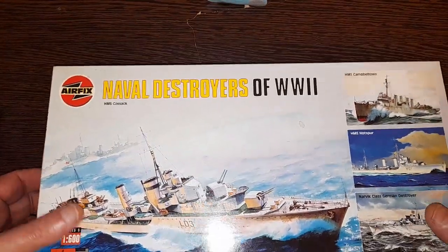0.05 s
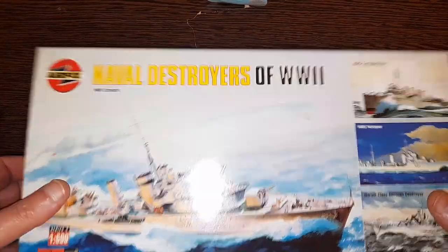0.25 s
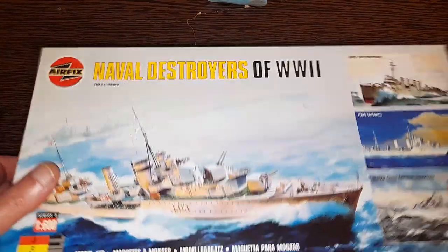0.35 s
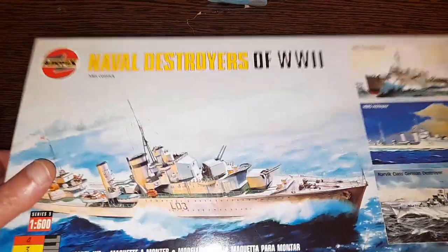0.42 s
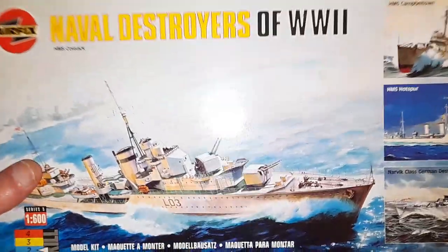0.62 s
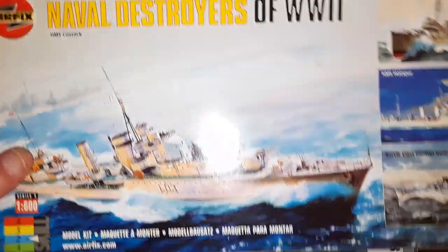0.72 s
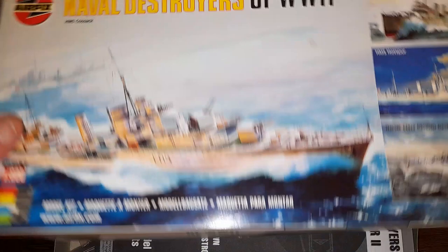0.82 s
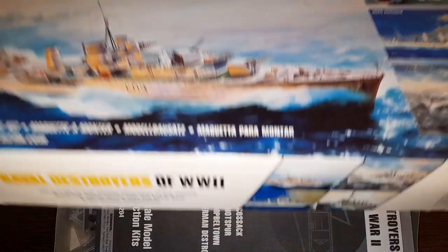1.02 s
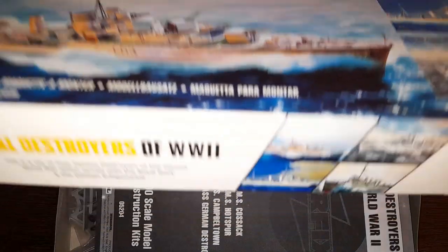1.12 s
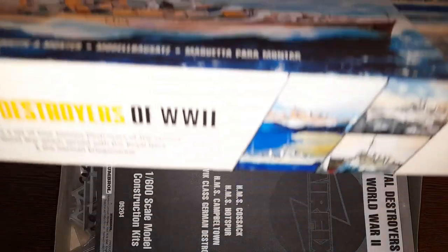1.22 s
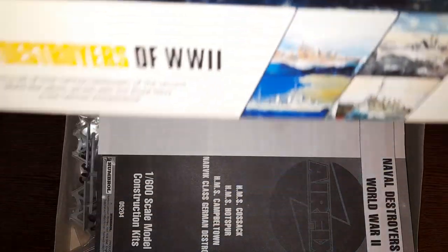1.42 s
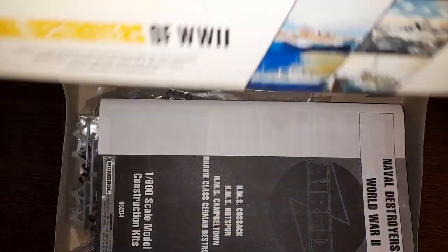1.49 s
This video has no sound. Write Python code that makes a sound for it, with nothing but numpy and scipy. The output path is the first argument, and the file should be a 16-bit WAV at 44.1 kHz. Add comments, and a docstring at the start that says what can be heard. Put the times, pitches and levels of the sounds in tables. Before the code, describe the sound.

A cardboard lid scrapes off its box, with hollow knocks and a papery slide.

```python
"""A cardboard lid is worked off its box by hand, close to the microphone in a small room.
First the tight walls stick and slip, and card scrapes and hisses against card.
Lid and box knock together, then the box drops on the table with a hollow boom.
Last, the freed lid bumps lightly a few times and slides away with a papery hiss."""
import sys
import numpy as np
from scipy import signal
from scipy.fft import rfft, irfft, next_fast_len
from scipy.io import wavfile
from scipy.ndimage import uniform_filter1d

SR = 44100
rng = np.random.default_rng(int(sys.argv[2]) if len(sys.argv) > 2 else 0)


def digitize_waveform(pressure):
    """Quantize a signal to 16-bit integers and store it at the path in sys.argv[1].

    Rows of a 2-D input are taken as channels; values are limited to [-1, 1].
    """
    field = np.atleast_2d(pressure).T
    bounded = np.clip(field, -1, 1)
    quanta = np.round(bounded * 32767).astype(np.int16)
    wavfile.write(sys.argv[1], SR, quanta)


N = 68355  # samples: 1.55 s


# How hard the walls shake: time_s, lid_db, box_db
WALL_SHAKE = [(0, -31.5, -47.5), (.04, -49.5, -50), (.1, -50, -57), (.125, -40, -61), (.165, -35.5, -60.5),
              (.195, -39.5, -39.5), (.22, -27, -30.5), (.255, -36, -36.5), (.285, -27, -31),
              (.32, -32, -21), (.355, -20, -42), (.385, -33.5, -28), (.43, -35, -36), (.48, -43, -49.5),
              (.58, -65, -66), (0.689, -74.5, -72), (0.729, -55.5, -75), (.8, -69, -80), (1.48, -88, -85),
              (1.545, -61.5, -57)]
# How hard the freed lid drags: time_s, level_db
DRAG_LEVEL = [(.69, -76.5), (.72, -53), (.78, -62.5), (.9, -71), (.945, -43), (.98, -54.5), (1.01, -57),
              (1.11, -63), (1.28, -61.5), (1.37, -77.5), (1.49, -89.5), (1.55, -66)]
# How much the air in the box is stirred: time_s, level_db
STIR_LEVEL = [(0, -54), (.1, -61.5), (.19, -54), (.225, -34.5), (.27, -26.5), (.34, -28.5), (.44, -32),
              (.55, -51), (.76, -79.5), (.81, -77), (.845, -48), (.89, -65), (1.2, -71.5), (1.3, -67.5),
              (1.38, -77), (1.5, -71.5), (1.55, -60)]
# Tones of the lid's walls: pitch_hz, width_hz, level_db
LID_WALL_TONES = [(436, 100, 0.5), (431, 77, -1.5), (489, 54, -4.5), (614.5, 14, -3.5), (619, 15, -7)]
# Tones of the box's walls: pitch_hz, width_hz, level_db
BOX_WALL_TONES = [(222, 52, -6), (265, 67, 1.5), (309.8, 42, 4.5)]
# Tones of the dragging lid: pitch_hz, width_hz, level_db
DRAG_TONES = [(330, 35, -4.5), (352, 23, -4.5), (420, 29, -3), (510, 46, -9)]
# Tones of the air inside: pitch_hz, width_hz, level_db
INSIDE_TONES = [(88, 60, 0), (140, 21, -10.5)]

def judder():
    """The tight walls stick and slip, stirring the air inside; later the freed lid drags."""
    lid = level(WALL_SHAKE) * shaken(LID_WALL_TONES)
    box = level(WALL_SHAKE, column=2) * shaken(BOX_WALL_TONES)
    drag = level(DRAG_LEVEL) * shaken(DRAG_TONES)
    air = level(STIR_LEVEL) * shaken(INSIDE_TONES)
    return amp(2.5) * (lid + box + drag + air)


def shaken(tones):
    """Uneven slips shake card or air, which answers most near its own tones."""
    def response(hz):
        return sum((-1) ** k * amp(db) * 1j * hz * width / (pitch ** 2 - hz ** 2 + 1j * hz * width)
                   for k, (pitch, width, db) in enumerate(tones))
    shaking = filtered(slips(per_s=380, spread_db=1, smooth=.78), response)
    return coloured(shaking, [(40, -4), (90, 10), (650, -2.5), (1500, -17)])


# Blows on the box: start_s, body_db, bright_hz, panel_hz, panel_db, boom_db, crack_db
BLOWS = [(0.214, -40.5, 450, 300, -14.5, -42.5, -57), (.267, -36, 700, 390, -13, -37, -35),
         (0.2884, -18.5, 1754, 1096, -3, -43.5, -12), (0.294, -6.5, 840, 607, 0.5, -22.5, -43),
         (0.3163, -28, 900, 520, -15, -39, -39), (0.3946, -13, 324, 350, -0.5, -10.5, -42),
         (0.439, -25.5, 325, 330, -18.5, -22, -44.5)]
# Ringing of the box (a fade is a fall of 60 dB): pitch_hz, level_db, fade_s
BOX_RING = [(233.5, -3.5, 0.17), (322, -9, 0.16), (404.2, -9.5, 0.14), (439, -4.5, .12), (511.6, 1, 0.1),
            (554, -17, 0.1), (587, -10.5, 0.037), (694, -22, 0.055), (826, -18.5, 0.053), (988, -16.5, .05),
            (975, -16.5, 0.027), (1195, -14.5, .07), (1316, -12, 0.033), (1486, -11.5, 0.17)]
# Boom of the hollow box on the table: pitch_hz, level_db, fade_s
BOOM_TONES = [(46.6, -13.5, 0.17), (77, -4.5, .1), (97.2, -0.5, 0.37), (110.8, 0, .13), (140.6, -11, 0.3)]

def knocks():
    """Each blow swings the struck panel, rings the box and pumps the air inside."""
    out, t = np.zeros((2, N)), np.arange(N) / SR
    boom_rise_s, flex_fade_s = .0027, .034
    rise_cycles, fade_cycles = .25, 16
    lead_rad = np.array([[.3], [-.3]])  # the boom reaches left and right out of step
    boom = sum(np.sin(2 * np.pi * hz * t + lead_rad) * amp(db - 60 * t / fade_s)
               for hz, db, fade_s in BOOM_TONES)
    boom *= 1 - np.exp(-t / boom_rise_s)
    for start_s, body_db, bright_hz, panel_hz, panel_db, boom_db, crack_db in BLOWS:
        cycles = panel_hz * t
        panel = np.sin(2 * np.pi * cycles) * amp(panel_db - 60 * cycles / fade_cycles)
        panel *= 1 - np.exp(-cycles / rise_cycles)
        # the card's many short-lived tones blur into a burst of noise
        flex = filtered(noise(CARD_COLOUR), lambda hz: softness(hz, bright_hz))
        flex *= amp(2 - 60 * t / flex_fade_s)
        body = amp(body_db) * (ring(BOX_RING, bright_hz) + flex)
        add(out, start_s, panel + body + amp(boom_db) * boom + amp(crack_db) * crack())
    return out


def ring(tones, bright_hz):
    """Struck card rings with fading tones, their levels a little different each time."""
    t = np.arange(N) / SR
    scatter_db, rise_s = 1.2, .00071
    out = np.zeros(N)
    for k, (hz, db, fade_s) in enumerate(tones):
        fade = amp(db + scatter_db * rng.normal() - 60 * t / fade_s)
        out += (-1) ** k * fade * softness(hz, bright_hz) * np.sin(2 * np.pi * hz * t)
    return out * (1 - np.exp(-t / rise_s))


def softness(hz, bright_hz):
    """A soft contact weakens the tones above bright_hz."""
    return 1 / np.hypot(1, (hz / bright_hz) ** 2)


# Tone colour of a snapping edge: pitch_hz, level_db
CRACK_COLOUR = [(200, -25.5), (700, 7.5), (1300, 14.5), (2400, -1), (4500, -2.5), (6500, -4), (9000, -15.5),
                (12000, -17), (16000, -19.5)]

def crack():
    """One card edge snaps past another with a short rasp."""
    t = np.arange(N) / SR
    hold_s, fade_s = .0035, .008
    return noise(CRACK_COLOUR) * amp(-60 * np.maximum(t - hold_s, 0) / fade_s)


# How hard a card edge scrapes: time_s, level_db
SCRAPE_LEVEL = [(0, -47), (.09, -49), (.14, -47), (.205, -36), (.258, -37.5), (.28, -31), (.34, -30.5),
                (.38, -32.5), (.42, -37), (.49, -50), (.6, -67), (.65, -69), (.695, -68.5), (.75, -77)]
# Hiss that follows the tight lid's sliding speed: time_s, level_db
HISS_LEVEL = [(0, -44.5), (.08, -65.5), (.12, -56.5), (.21, -37), (.255, -46), (.275, -34), (.345, -37.5),
              (.378, -48.5), (.41, -40.5), (.48, -58.5), (.6, -80.5), (.648, -58.5), (.695, -72.5),
              (.75, -91.5)]
# Tone colour of scraped or struck card: pitch_hz, level_db
CARD_COLOUR = [(100, -25), (450, -2), (750, 6), (1100, 6.5), (1550, 1.5), (2200, -8.5), (3000, -20),
               (5000, -23.5), (16000, -78.5)]
# Tone colour of paper fibres: pitch_hz, level_db
FIBRE_COLOUR = [(500, -54.5), (1500, 6.5), (2600, 3.5), (4500, -1.5), (6500, -3.5), (9000, -10),
                (12000, -8.5), (16000, -13.5)]

def rubbing():
    """As the tight lid slides, coarse grains scrape the panels and fine fibres hiss."""
    scrape = amp(2.5) * coloured(slips(per_s=1100, spread_db=2, smooth=.8), CARD_COLOUR)
    hiss = amp(7.5) * coloured(slips(per_s=2600, spread_db=2.5, smooth=.83), FIBRE_COLOUR)
    return level(SCRAPE_LEVEL) * scrape + level(HISS_LEVEL) * patchy(hiss)


def slips(per_s, spread_db, smooth):
    """Card lets go in tiny random jerks, on top of a share of smooth drag."""
    jerks = (rng.random(N) < per_s / SR) * amp(spread_db * rng.standard_normal(N))
    return unit(jerks * rng.standard_normal((2, N))) + smooth * rng.standard_normal((2, N))


def patchy(hiss):
    """The hiss changes colour as different patches of card touch."""
    patch_hz, patch_s, depth_db = 500, .06, 2.5
    hz, t, bands = signal.stft(hiss, SR, nperseg=512)
    patches = rng.standard_normal(bands.shape[1:])
    patches = uniform_filter1d(patches, round(patch_hz / hz[1]), axis=0)
    patches = uniform_filter1d(patches, round(patch_s / t[1]), axis=1)
    bands *= amp(depth_db * unit(patches))
    return unit(signal.istft(bands, nperseg=512)[1][:, :N])


# Bumps of the freed lid: start_s, ring_db, bright_hz, tick_db
LID_BUMPS = [(.713, -49, 1500, -58.5), (0.802, -42.5, 500, -61), (0.8118, -30, 600, -58),
             (0.8219, -25.5, 648, -50.5), (1.039, -37.5, 1290, -48.5), (1.047, -43.5, 610, -61)]
# Ringing of the freed lid: pitch_hz, level_db, fade_s
LID_RING = [(290, -35, 0.054), (324, 4.5, 0.091), (378, -9, 0.075), (428.4, 2.5, .12), (480, -12, 0.13),
            (763, -15, .07), (1200, -16.5, .08), (1628, -10.5, 0.13), (2324, -19, 0.066)]

def taps():
    """The freed lid bumps lightly and rings, a little to the right."""
    out = np.zeros((2, N))
    for start_s, ring_db, bright_hz, tick_db in LID_BUMPS:
        add(out, start_s, amp(ring_db) * ring(LID_RING, bright_hz) + amp(tick_db) * crack())
    low_cut_hz = 233  # a small panel gives little bass
    thin = filtered(out, lambda hz: (1j * hz / (low_cut_hz + 1j * hz)) ** 2)
    return lean_right(thin, db=1.5)


# How hard the loose lid brushes: time_s, rasp_db, hiss_db
BRUSH_LEVEL = [(.695, -77, -90.5), (.72, -54.5, -73), (.755, -64.5, -66), (.79, -58.5, -60.5),
               (.83, -55, -69.5), (.89, -78, -75), (.915, -59, -63), (.945, -53, -53), (1.01, -58, -70),
               (1.075, -64.5, -74.5), (1.115, -62, -71.5), (1.142, -48, -55), (1.165, -58, -69),
               (1.27, -58.5, -72), (1.35, -78, -84), (1.49, -77.5, -73.5), (1.54, -51.5, -58)]
# Tone colour of its rasp: pitch_hz, level_db
RASP_COLOUR = [(300, -25), (650, -4.5), (1100, -1), (1650, 3.5), (2350, 0.5), (3400, -7), (4500, -6),
               (6500, -8), (9000, -13), (16000, -21.5)]
# Tone colour of its fine, high hiss: pitch_hz, level_db
FINE_COLOUR = [(2000, -30), (5500, -14), (7500, -1), (9000, -14.5), (11000, -3.5), (14000, -0.5),
               (16000, -8)]

def brushing():
    """The loose lid brushes past with a light rasp and a finer hiss on top."""
    rasp = level(BRUSH_LEVEL) * patchy(noise(RASP_COLOUR))
    hiss = level(BRUSH_LEVEL, column=2) * noise(FINE_COLOUR)
    return amp(3.5) * (rasp + hiss)


# How long the room's echo lasts: pitch_hz, fade_s
ECHO_FADE = [(100, 0.16), (400, 0.2), (2000, .27), (12000, 0.53)]

def room_echo(sound):
    """The small room returns a short wash of echoes, different on each side."""
    hz, t, bands = signal.stft(rng.standard_normal((2, SR // 2)), SR, nperseg=256)
    bands *= amp(-60 * t / along(ECHO_FADE, hz)[:, None])
    tail = signal.istft(bands, SR, nperseg=256)[1]
    tail /= np.linalg.norm(tail[0])
    tail = np.pad(tail, ((0, 0), (SR // 250, 0)))  # arrives 4 ms late
    return signal.fftconvolve(sound, tail, axes=1)[:, :N]


# Tone colour of the quiet room: pitch_hz, level_db
BACKGROUND_COLOUR = [(25, -5.5), (75, 5), (180, -7), (330, -4), (700, -35), (1500, -28.5), (4000, -29),
                     (16000, -21.5)]

def background():
    """A faint, steady rumble lies under everything."""
    return amp(-62) * noise(BACKGROUND_COLOUR)


# How alike left and right are (1 is the same, 0 unrelated): pitch_hz, likeness
STEREO_LIKENESS = [(100, 0.66), (500, .85), (1100, 0.053), (3000, 0.081), (12000, 0.039)]

def coloured(pair, colour):
    """Blend two unrelated signals into stereo with a tone colour of (pitch_hz, level_db) points."""
    def response(hz):
        angle = np.arccos(np.clip(along(STEREO_LIKENESS, hz), -1, 1)) / 2
        return amp(along(colour, hz)) * [np.cos(angle), np.sin(angle)]
    mid, side = filtered(pair, response)
    return unit(np.array([mid + side, mid - side]))


def noise(colour):
    """Smooth stereo noise with a tone colour."""
    return coloured(rng.standard_normal((2, N)), colour)


def amp(db):
    """Turn decibels into a gain."""
    return 10 ** (np.asarray(db) / 20)


def unit(x):
    """Scale to an average strength (rms) of 1."""
    return x / np.sqrt(np.mean(x ** 2) + 1e-20)


def along(points, hz):
    """Read between (pitch_hz, value) points on a musical (log) scale."""
    pitches, values = np.transpose(points)
    return np.interp(np.log(hz + 1), np.log(pitches + 1), values)


def level(rows, column=1):
    """A gain for each sample, from a table's times and one of its decibel columns."""
    columns = np.transpose(rows)
    return amp(np.interp(np.arange(N) / SR, columns[0], columns[column]))


def filtered(x, response):
    """Turn each frequency up or down by response(hz)."""
    size = next_fast_len(N + SR // 2)
    return irfft(rfft(x, size) * response(np.fft.rfftfreq(size, 1 / SR)), size)[..., :N]


def add(track, start_s, sound):
    """Mix a sound in from start_s on."""
    i = round(start_s * SR)
    track[..., i:] += sound[..., :N - i]


def lean_right(sound, db):
    """Turn the left side down and the right side up."""
    return sound * amp([[-db], [db]])


def scene():
    """Box and lid close by, in a quiet room."""
    card = judder() + knocks() + rubbing() + brushing() + taps()
    return lean_right(card + amp(-7.5) * room_echo(card), db=.5) + background()


# Tone colour of the microphone: pitch_hz, gain_db
MIC_COLOUR = [(20, -38.5), (42, -5), (7300, 0.5), (8100, -8.5), (9500, -2), (16000, 1)]

def record(dry):
    """The microphone colours the sound, clips at full scale and loses the highest treble."""
    heard = filtered(dry, lambda hz: amp(along(MIC_COLOUR, hz)))
    return filtered(np.clip(heard, -1, 1), lambda hz: hz < 16000)


dry = scene()
out = record(dry)
digitize_waveform(out)
```